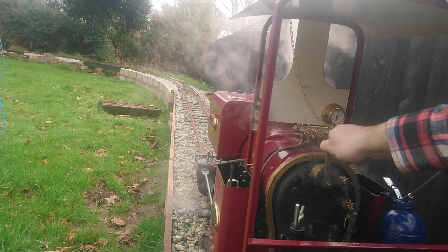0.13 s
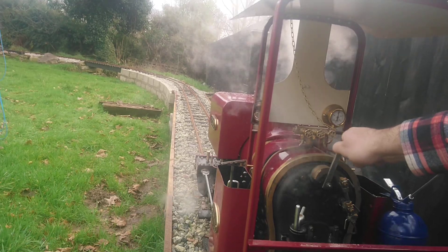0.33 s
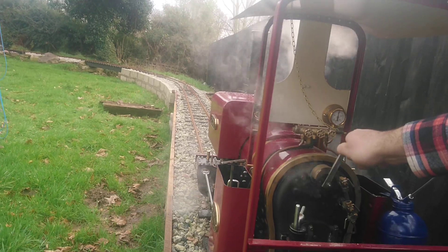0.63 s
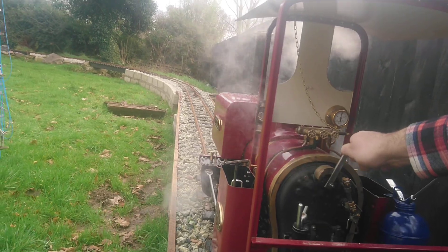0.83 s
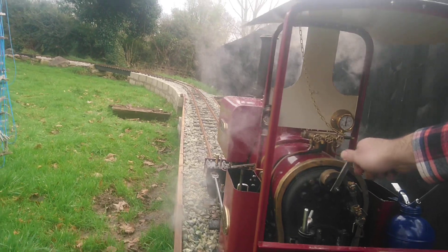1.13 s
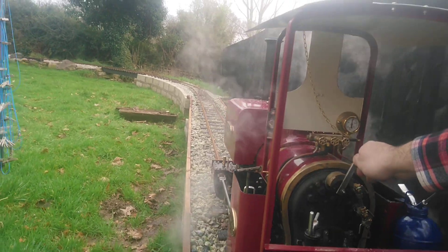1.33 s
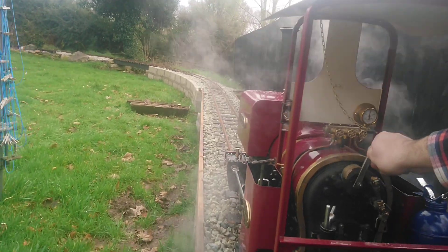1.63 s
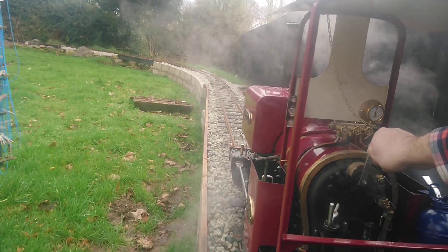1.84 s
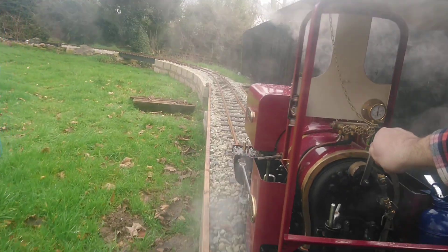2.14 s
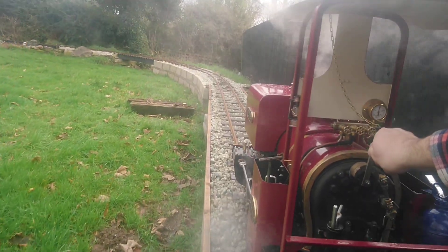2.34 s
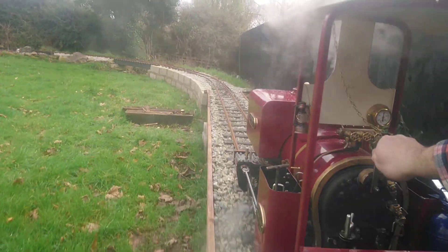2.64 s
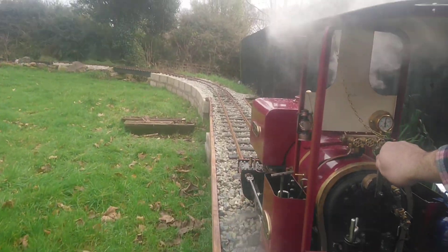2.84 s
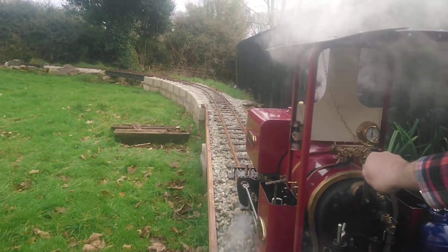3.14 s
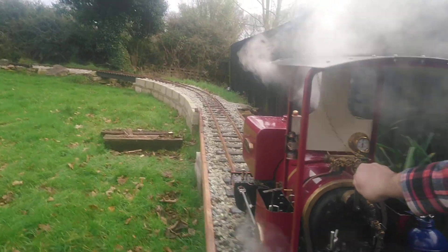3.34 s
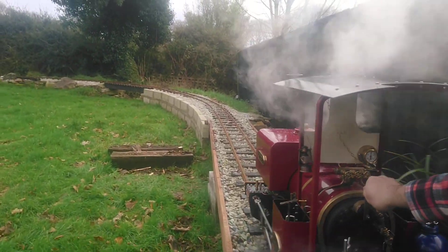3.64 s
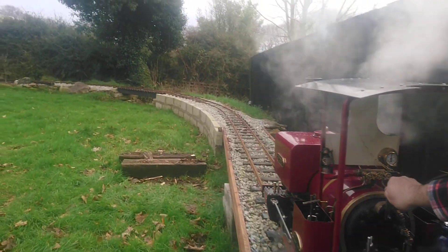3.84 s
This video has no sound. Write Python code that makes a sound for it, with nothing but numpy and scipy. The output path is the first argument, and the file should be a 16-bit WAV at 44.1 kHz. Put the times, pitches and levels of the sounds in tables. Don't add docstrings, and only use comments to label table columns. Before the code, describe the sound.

A small steam locomotive starts, heard close behind its cab. It fades in from near silence to bright steam hiss by 0.3 s; the coupling clanks at 0.8 s while a thin, fuzzy whistle colours the fading hiss. Heavy, breathy chuffs begin at 1.3 s, about four per second, quickening to eight or nine by 3 s, with hollow low booms, short hooting tones, small metal knocks and growing wheel rumble to 4 s.

```python
import sys
import numpy as np
from scipy import signal
from scipy.fft import rfft, irfft
from scipy.io import wavfile
from scipy.ndimage import uniform_filter1d, map_coordinates

SR = 44100
rng = np.random.default_rng(int(sys.argv[2]) if len(sys.argv) > 2 else 0)


def to_wav(s):
    ch = np.atleast_2d(s).T
    pcm = np.round(np.clip(ch, -1, 1) * 32767)
    wavfile.write(sys.argv[1], SR, pcm.astype(np.int16))


def level_to_linear(level):
    exponent = np.asarray(level, float) / 20
    return 10 ** exponent


N = 176400
T = np.arange(N) / SR
HZ = np.fft.rfftfreq(N, 1 / SR)

# time_s, smokebox_db, chimney_hum_db
DRAUGHT = [(.1, -56.5, -58), (.5, -42.5, -45), (.75, -30, -36.5), (1.0, -34, -36.5), (1.29, -29.5, -42),
           (1.33, -22, -42), (1.52, -22, -35.5), (1.6, -18, -40.5), (1.8, -20, -24.5), (2.1, -19.5, -37.5),
           (2.2, -19, -27.5), (2.65, -21, -25.5), (2.75, -19, -38.5), (3.2, -21, -44.5), (4.0, -21.5, -35)]
# time_s, hiss_db, whistle_share_db, fizz_share_db
LEAK = [(.1, -29, -22, 1.5), (.35, -21.5, -20, -1), (.78, -22, -8.5, -5), (.92, -26, -8, -1.5),
        (.98, -24.5, 0, -2.5), (1.06, -28, -5, 0.5), (1.15, -30, -4.5, 2.5), (1.19, -31.5, -8, -3),
        (1.55, -34, -3, 2.5), (1.66, -22.5, -16, -11), (1.95, -25.5, -26, -8.5), (2.12, -33.5, -9, -3),
        (2.7, -34.5, -9, -6.5), (3.4, -33.5, -24, -5.5), (4.0, -43, -30, 6)]


def exhaust():
    # start_s, jet_db, fall_s, chimney_db, tail_db
    beats = [(1.3088, -10.5, 0.063, -21.5, -15.5), (1.5626, -6.5, 0.03, -28.5, -21.5),
             (1.762, -8, 0.043, -56, -20), (1.8606, -26, 0.014, -19.5, -28),
             (2.001, -13.5, 0.015, -34, -35), (2.162, -12, 0.043, -27.5, -37),
             (2.298, -16, 0.034, -40, -35), (2.4286, -17, 0.055, -29.5, -20.5),
             (2.597, -22, 0.025, -48, -47), (2.725, -17.5, 0.033, -22.5, -29),
             (2.8443, -11, 0.01, -32, -54), (2.9613, -15, 0.044, -28, -24.5),
             (3.114, -17.5, 0.022, -28, -32), (3.23, -12, 0.023, -35, -32),
             (3.3318, -27, 0.036, -27.5, -27), (3.4364, -14.5, 0.06, -25.5, -29),
             (3.572, -18, 0.026, -27, -33), (3.6783, -11, 0.024, -34, -40), (3.7708, -19, 0.02, -36.5, -31),
             (3.869, -18.5, 0.052, -27.5, -29.5), (3.986, -30, 0.033, -47, -23)]
    # frequency_hz, level_db
    jet_spectrum = [(60, -45), (900, -19), (2000, 3), (3500, 5), (6000, 4), (9000, -6.5), (12000, -18),
                    (16000, -13)]
    # frequency_hz, level_db
    tail_spectrum = [(60, -36), (900, 1), (2000, 0.5), (3500, 4), (6000, -4), (9000, -8), (12000, -22),
                     (16000, -55)]
    # frequency_hz, width_hz, level_db
    overtones = [(1280, 61, 5.5), (2015, 92, 6.5), (2450, 85, -0.5), (2760, 45, 2.5), (3363, 66, 3),
                 (4080, 30, -6), (4280, 110, -2.5), (4654, 69, 0), (5390, 75, -3.5), (5700, 38, -2.5),
                 (6670, 154, -9)]
    # frequency_hz, width_hz, level_db
    lowest_tone = [(623, 31, -5), (668, 48, 7)]
    pipe_rise_s, pipe_fall_s = 0.0062, 0.074
    regulator_s, blow_by_db = 1.55, -10.5

    jet = sum(level_to_linear(db - 4.5) * puff(s - 0.004, 0.0044, fall_s) for s, db, fall_s, _, _ in beats)
    tail = sum(level_to_linear(db - 5) * puff(s, pipe_rise_s, 0.13) for s, *_, db in beats)
    blow = sum(level_to_linear(db) * puff(s, pipe_rise_s, pipe_fall_s) for s, _, _, db, _ in beats)
    hum = level_to_linear(curve(DRAUGHT, count=2))
    blow_by = level_to_linear(curve(LEAK) + blow_by_db) * (T > regulator_s)

    ringing = resonances([(hz, width, 0) for hz, width, _ in overtones], steep=0.66)
    jet_noise = noise(level_to_linear(read(jet_spectrum)) * (1 + 0.39 * ringing))
    tail_noise = noise(level_to_linear(read(tail_spectrum)) * (1 + 0.87 * ringing))
    pipe_tones = retuned(noise(resonances(overtones, steep=0.57)))
    low_tone = noise(resonances(lowest_tone, steep=0.86))

    sound = jet * flutter(1.2, 110) * jet_noise
    sound = sound + tail * flutter(1.0, 60) * tail_noise
    sound = sound + (blow + 0.49 * hum + blow_by) * flutter(2.1, 46) * pipe_tones
    return sound + (0.67 * hum + 0.43 * blow) * low_tone


def hoots():
    # start_s, level_db, pitch_hz
    gusts = [(1.329, -27, 630), (1.61, -24, 696), (1.777, -21, 650), (1.809, -15, 676), (1.88, -14, 666),
             (2.029, -19.5, 700), (2.175, -18, 673), (2.258, -20, 662), (2.314, -19.5, 662),
             (2.427, -19.5, 702), (2.556, -18.5, 627), (2.631, -15.5, 658), (2.85, -19, 668),
             (2.965, -19, 647), (3.246, -23, 708), (3.871, -23, 637)]
    return rings(gusts, rise_s=0.0038, fall_s=0.02, trim_db=-1.5, lead_s=0.00509)


def smokebox():
    # frequency_hz, width_hz, level_db
    cavity = [(178, 144, -9.5), (239.3, 35, 0), (287, 35, -6)]
    # start_s, level_db, pitch_hz
    slugs = [(1.335, -20.5, 269.5), (1.401, -15, 241.4), (1.596, -10, 241.7), (1.742, -17, 240),
             (1.91, -17, 245), (1.963, -22, 248.4), (2.016, -14.5, 257), (2.059, -16.5, 282),
             (2.15, -15, 238), (2.188, -17, 257), (2.239, -10, 235), (2.306, -16.5, 256),
             (2.501, -10.5, 242), (2.57, -21, 264), (2.774, -18, 270.5), (2.86, -8, 242), (2.963, -16, 258),
             (3.044, -14, 270.4), (3.127, -12.5, 228), (3.174, -12.5, 227), (3.232, -15, 255.3),
             (3.278, -10, 231), (3.334, -10, 233), (3.403, -19, 236.4), (3.508, -12, 241.7),
             (3.706, -7.5, 227), (3.781, -13, 226), (3.853, -23, 243), (3.952, -10.5, 236)]
    boom = noise(resonances(cavity, steep=0.79) * (HZ / (HZ + 60)) ** 2)
    lumps = rings(slugs, rise_s=0.014, fall_s=0.036, trim_db=-4.5, lead_s=0.00797)
    return level_to_linear(curve(DRAUGHT) - 2) * boom + lumps


def leak():
    # frequency_hz, level_db
    hiss_spectrum = [(500, -17.5), (1500, -4.5), (2500, 5.5), (3500, 6.5), (6000, 4), (9000, -2),
                     (12000, -6.5), (16000, -4)]
    # frequency_hz, width_hz, level_db
    ridges = [(7140, 140, 6.5), (7340, 82, 5), (12000, 140, 9.5)]
    # frequency_hz, width_hz, level_db
    slits = [(3025, 40, 0), (3205, 55, 0)]
    # frequency_hz, width_hz, level_db
    left_shadow = [(4170, 170, -22)]
    cab_echo_s = np.array(np.array([[.0023, .0037, .0061], [.0019, .0041, .0056]]))
    cab_echo_db, fizz_hz = -11, 7900

    shadow = level_to_linear(np.array([bumps_db(left_shadow), 0 * HZ]))
    echoes = np.exp(-2j * np.pi * HZ * cab_echo_s[..., None]).sum(1)
    path = shadow * (1 + level_to_linear(cab_echo_db) * echoes)
    colour = level_to_linear(read(hiss_spectrum) + bumps_db(ridges)) * (HZ / (HZ + 300)) ** 2
    hiss = rfft(noise(colour * path))

    fizz_share = 1 / (1 + (fizz_hz / (HZ + 1)) ** 8)
    fizz = level_to_linear(curve(LEAK, count=3)) * irfft(hiss * fizz_share, N)
    hiss = irfft(hiss * (1 - fizz_share), N) + fizz

    port_gain = level_to_linear(np.array([[-5], [1.5]]))
    whistle = noise(resonances(slits, steep=0.48)) * flutter(1.0, 28) * port_gain
    return level_to_linear(curve(LEAK)) * (hiss * flutter(0.46, 40) + level_to_linear(curve(LEAK, count=2)) * whistle)


def coupling():
    # start_s, level_db, low_ring_db, middle_ring_db
    clanks = [(.773, -23.5, -13, -16), (0.8126, -9.5, 3.5, -1), (.828, -24.5, 21.5, 2), (.845, -27, 13, -7),
              (0.861, -20.5, 4.5, -2), (.874, -25, 0, -1), (.883, -31, -3, 1), (0.904, -31, 11, 6)]
    # frequency_hz, level_db, t60_s
    modes = [(327, -5.5, 0.032), (355, -2.5, 0.045), (520, -1, 0.037), (700, 6, 0.035), (850, -1, 0.05),
             (922, -1, .06), (983, 3.5, 0.076), (1170, -7, 0.033), (1306, -11, 0.13), (1820, -11, .018)]
    # start_s, level_db, pitch_hz
    knocks = [(2.046, -15, 840), (2.604, -10.5, 1250), (2.636, -13, 786), (3.009, -23, 1320),
              (3.149, -17, 790), (3.619, -18, 1280)]
    out, t = np.zeros(N), np.arange(SR // 5) / SR
    contact = np.minimum(t / 0.00069, 1)
    for s, db, low_db, middle_db in clanks:
        for hz, mode_db, t60 in modes:
            share_db = low_db * (hz < 450) + middle_db * (450 <= hz < 780)
            decay = level_to_linear(db + mode_db + share_db - 8.5 - 60 * t / t60)
            add(out, s, decay * np.sin(2 * np.pi * hz * t) * contact)
    return out + rings(knocks, rise_s=0.002, fall_s=0.0061, trim_db=-5.5)


def wheels():
    # frequency_hz, level_db
    rumble = [(60, -39), (100, -4.5), (140, -2.5), (300, -10), (450, -15), (550, -3.5), (1000, -4.5),
              (1700, -9)]
    # frequency_hz, width_hz, level_db
    wheel_modes = [(323, 70, -1), (385.7, 45.6, 5.5)]
    # time_s, rolling_db, wheel_ring_share_db
    speed = [(.1, -59, -5), (1.25, -42.5, -8), (1.6, -33.5, 0.5), (2.5, -31, 1.5), (3.2, -30, 3),
             (3.6, -30, 7.5), (4.0, -31, 6.5)]
    # frequency_hz, level_db
    frame_spectrum = [(20, -30), (35, -27), (50, 0.5), (70, 5.5), (110, -10), (160, -4), (300, -21.5)]
    roll = noise(level_to_linear(read(rumble)) / (1 + (HZ / 2500) ** 4) * np.minimum(HZ / 60, 1) ** 4)
    roll = roll + level_to_linear(curve(speed, count=2)) * noise(resonances(wheel_modes, steep=0.55))
    shake = level_to_linear(-41.5) * np.clip(T / 1.1, 0, 1) * noise(level_to_linear(read(frame_spectrum)))
    return level_to_linear(curve(speed)) * flutter(1.84, 30) * roll + flutter(2.3, 3.7) * shake


def puff(start_s, rise_s, fall_s):
    t = np.maximum(T - start_s, 0)
    return (1 - np.exp(-(t / rise_s) ** 2)) * np.exp(-t / fall_s)


def rings(rows, rise_s, fall_s, trim_db, lead_s=0):
    out, t = np.zeros(N), np.arange(SR // 5) / SR
    shape = (1 - np.exp(-(t / rise_s) ** 2)) * np.exp(-t / fall_s)
    shape = shape / shape.max()
    for (s, db, hz), phase in zip(rows, rng.random((len(rows), 1))):
        tone = np.sin(2 * np.pi * (hz * t + phase))
        add(out, s - lead_s, level_to_linear(db + trim_db) * shape * tone)
    return out


def retuned(x):
    # time_s, detune_cents
    tuning = [(1.3, 0), (1.8, 22), (2.1, 10), (2.6, -25), (3.0, -15), (4.0, -20.5)]
    waver = uniform_filter1d(rng.standard_normal(N), size=3000)
    waver = evened(uniform_filter1d(waver, size=3000))
    cents = curve(tuning) + 12 * waver
    at = np.cumsum(2 ** (cents / 1200))
    return np.array([map_coordinates(row, [at], order=2, mode="mirror") for row in x])


def patchy(x):
    depth_db = 1.2
    z = signal.stft(x, nperseg=512)[2]
    patches = uniform_filter1d(rng.standard_normal(z.shape[1:]), size=4, axis=0)
    patches = evened(uniform_filter1d(patches, size=8, axis=1))
    gain = level_to_linear(depth_db * patches - depth_db ** 2 / 9)
    return signal.istft(z * gain, nperseg=512)[1][:, :N]


def flutter(depth_db, rate_hz):
    z = rfft(rng.standard_normal(N)) / np.sqrt(HZ + 2) * (HZ > 2) / (1 + (HZ / rate_hz) ** 4)
    return level_to_linear(depth_db * evened(irfft(z, N)))


def noise(gain):
    # frequency_hz, coherence
    likeness = [(30, 0.78), (100, 1), (200, 0.97), (450, 0.79), (800, 1), (1500, 0.44), (3500, 0.9),
                (5500, 0.16), (7000, .15), (16000, .1)]
    # frequency_hz, lead_rad
    right_lead = [(50, 0), (600, 0.34), (2000, 0.9), (4000, 0.99), (5200, 0.14)]
    left, other = rfft(rng.standard_normal((2, N)))
    same = np.clip(read(likeness), 0, 1)
    right = (same * left + np.sqrt(1 - same ** 2) * other) * np.exp(1j * read(right_lead))
    return evened(irfft(np.array([left, right]) * gain, N))


def resonances(rows, steep):
    peaks = [level_to_linear(db) / (1 + (2 * (HZ - hz) / width) ** 2) ** steep for hz, width, db in rows]
    return np.sqrt(sum(peak ** 2 for peak in peaks))


def bumps_db(rows):
    return sum(db * np.exp(-2 * ((HZ - hz) / width) ** 2) for hz, width, db in rows)


def read(points):
    f, value = np.transpose(points)
    return np.interp(np.log(HZ + 1), np.log(f + 1), value)


def curve(rows, count=1):
    rows = np.array(rows)
    return np.interp(T, rows[:, 0], rows[:, count])


def evened(x):
    return x / np.sqrt(np.mean(x ** 2) + 1e-20)


def add(mix, start_s, sound):
    part = mix[round(start_s * SR):][:len(sound)]
    part += sound[:len(part)]


def scene():
    return patchy(exhaust()) + hoots() + smokebox() + leak() + coupling() + wheels()


def roll_off(x):
    return signal.sosfilt(signal.butter(12, 15900, fs=SR, output="sos"), x)


def record(dry):
    # frequency_hz, level_db
    left_port = [(100, 0), (1300, 1), (2200, -3.5), (3500, -2.5), (5000, -1.5), (6800, 4.5), (9000, 5.5),
                 (16000, 7)]
    right_port = [(100, 1.5), (1300, -0.5), (2200, 0), (4200, 3.5), (5500, -1), (7200, -15), (9000, -20),
                  (16000, -6.5)]
    # frequency_hz, width_hz, level_db
    left_dips = [(4320, 550, -4), (8110, 700, -7)]
    right_dips = [(7850, 110, -12), (10300, 1500, -22), (11000, 2360, -18.5)]
    limit, edge_hz = 0.75, 15830
    fade_start_s, fade_s = 0.12, 0.18

    left_db = read(left_port) + bumps_db(left_dips)
    right_db = read(right_port) + bumps_db(right_dips)
    ports = level_to_linear(np.array([left_db, right_db])) * (HZ < edge_hz)
    squeezed = limit * np.tanh(dry / limit)
    heard = irfft(rfft(squeezed) * ports * np.minimum(HZ / 45, 1) ** 3, N)
    fade = np.clip((T - fade_start_s) / fade_s, 0, 1) ** 0.7
    return roll_off(heard * fade)


dry = scene()
out = record(dry)
to_wav(out)
```